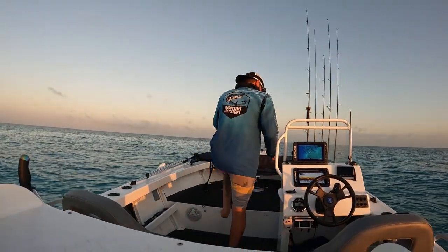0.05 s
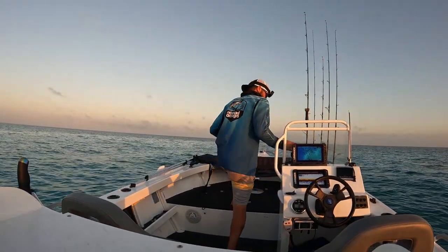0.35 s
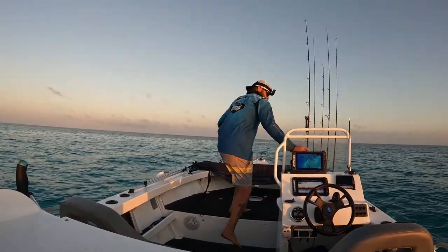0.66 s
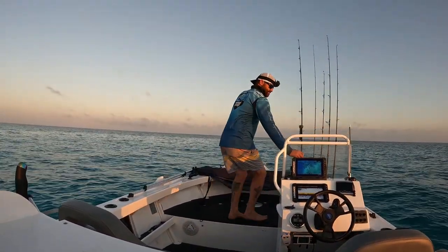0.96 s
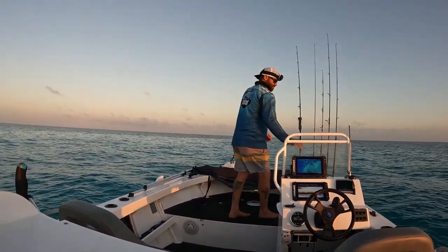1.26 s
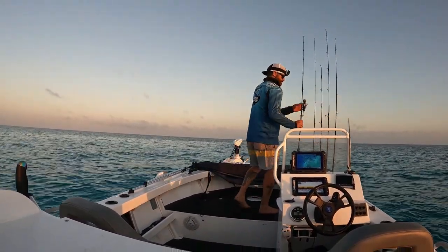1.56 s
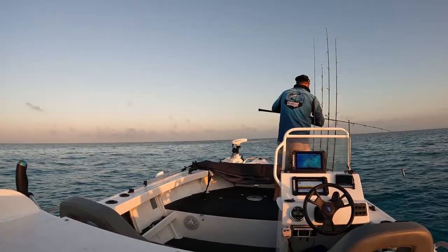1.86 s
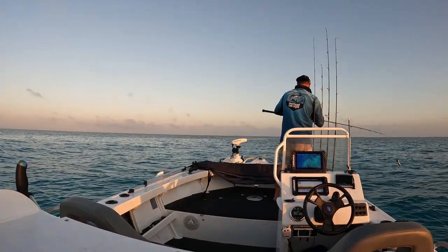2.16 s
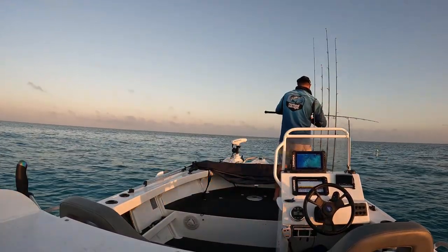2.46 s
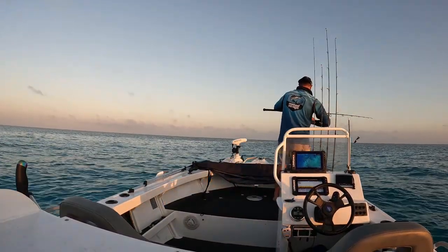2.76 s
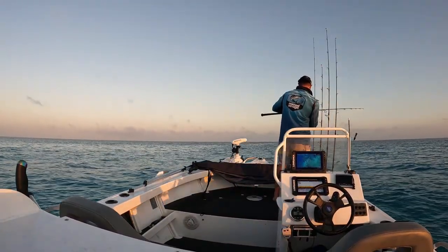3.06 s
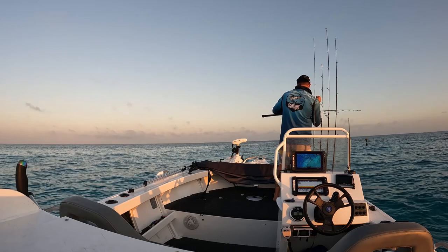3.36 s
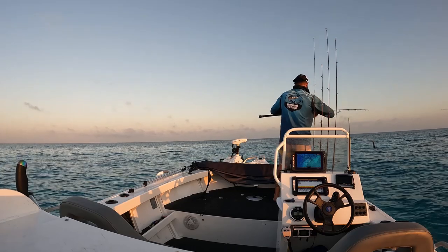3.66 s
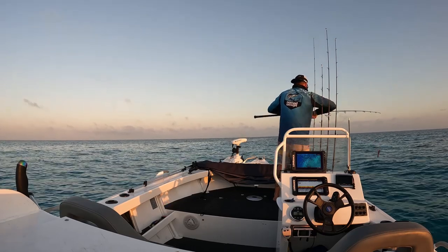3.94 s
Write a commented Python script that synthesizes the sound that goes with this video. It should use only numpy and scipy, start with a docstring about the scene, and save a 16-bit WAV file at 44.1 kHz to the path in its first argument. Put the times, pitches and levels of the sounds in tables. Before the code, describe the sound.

Low thuds of feet cross the deck of a small drifting boat, over wind rumbling on the microphone. Wavelets slap the metal hull, water trickles and gurgles alongside, and faint ticks from a fishing rod follow.

```python
"""A low rumble of wind and swell comes first, with bare feet thumping along a small metal boat's deck.
Water trickles along the side of the drifting boat; air pockets glug under it and bubbles splash, each
ringing at its own resonance. A few dry clicks sound and someone rustles about. Wavelets slap the hull
and excite the modes of its plates, and fishing tackle ticks faintly."""
import sys
import numpy as np
from scipy import signal
from scipy.fft import rfft, irfft, next_fast_len
from scipy.io import wavfile
from scipy.ndimage import uniform_filter1d, map_coordinates

SR = 44100
rng = np.random.default_rng(int(sys.argv[2]) if len(sys.argv) > 2 else 0)


def put_to_file(sound):
    """Save the sound as 16-bit audio at rate SR, in the file named by the first command-line argument."""
    columns = np.atleast_2d(sound).T  # one column per channel
    safe = np.clip(columns, -1, 1)
    whole_steps = np.round(safe * 32767)
    wavfile.write(sys.argv[1], SR, whole_steps.astype(np.int16))


N = 176400


def amp(db):
    """Decibels to amplitude ratio."""
    return 10 ** (np.asarray(db) / 20)


def unit(x):
    """Normalisation to rms 1."""
    return x / np.sqrt(np.mean(x ** 2) + 1e-20)


def since(start_s):
    """Seconds since start_s, for every sample."""
    return np.arange(N) / SR - start_s


def level(rows):
    """Amplitude envelope through (time_s, level_db) points."""
    return amp(np.interp(since(0), *np.transpose(rows)))


def wobble(knots_per_s):
    """Smooth random modulation: a spline through Gaussian values."""
    knots = rng.standard_normal(int(N * knots_per_s / SR) + 4)
    return map_coordinates(knots, [np.arange(N) * knots_per_s / SR])


def filtered(x, response):
    """Linear filtering: the spectrum of x times a frequency response."""
    size = next_fast_len(N + SR // 2)
    return irfft(rfft(x, size) * response(np.fft.rfftfreq(size, 1 / SR)), size)[:N]


def noise(spectrum, grain_db=0):
    """Coloured noise of rms 1; amplitude modulation by grain_db breaks it into millisecond grains."""
    points_hz, gains_db = np.transpose(spectrum)
    white = rng.standard_normal(N) * amp(grain_db * wobble(900))
    return unit(filtered(white, lambda hz: amp(np.interp(np.log(hz + 1), np.log(points_hz), gains_db))))


def patchy(x, depth_db, patch_hz=550, patch_s=0.04):
    """Spectral modulation: x swells and fades in random patches of time and frequency."""
    spectra = signal.stft(x, nperseg=1024)[2]
    field = rng.standard_normal(spectra.shape)
    for axis, width in enumerate([patch_hz * 1024 / SR, patch_s * SR / 512]):
        field = uniform_filter1d(field, max(1, round(width)), axis)
    return unit(signal.istft(spectra * amp(depth_db * unit(field)), nperseg=1024)[1][:N])


def swell(t, rise_s):
    """Transient envelope: a soft rise to 1 at rise_s, then a near-exponential fall."""
    u = np.maximum(t, 0) / rise_s
    return (u * np.exp(1 - u)) ** 2


def burst(t, rise_s, decay_s, tail_db, tail_s):
    """Impact envelope: exponential growth until t = 0, then a main decay plus a weaker one."""
    before, after = np.minimum(t, 0), np.maximum(t, 0)
    return np.exp(before / rise_s) * (np.exp(-after / decay_s) + amp(tail_db) * np.exp(-after / tail_s))


def deck_echo(x, decay_s=0.008):
    """Early reflections from the deck and sides, equal in energy to the direct sound."""
    t = np.arange(SR // 10) / SR
    echo = rng.standard_normal(len(t)) * np.exp(-t / decay_s)
    return (x + signal.fftconvolve(x, echo / np.linalg.norm(echo))[:N]) / np.sqrt(2)


# Envelopes of the wind and of the water churning under the hull: time_s, level_db
WIND_LEVELS = [(0, -31), (.3, -30.5), (.38, -34.5), (.48, -28.5), (.72, -34), (.9, -29), (1.35, -37),
               (1.52, -29.5), (1.74, -36), (2.17, -37), (2.6, -42.5), (2.82, -21.5), (3.03, -41.5),
               (3.17, -51.5), (3.26, -32.5), (3.43, -40), (3.8, -32), (4, -31.5)]
CHURN_LEVELS = [(0, -49), (.22, -39.5), (.38, -38.5), (.72, -45.5), (.82, -35), (1.08, -30.5), (1.33, -43),
                (2.02, -44), (2.09, -60), (2.17, -43.5), (2.38, -42.5), (2.55, -39), (2.9, -39.5),
                (3.11, -53), (3.31, -35.5), (3.42, -50), (3.8, -39.5), (4, -39.5)]
# Their spectra: frequency_hz, gain_db
WIND_BANDS = [(28, -1), (50, -4.5), (90, -8.5), (150, -17), (400, -52), (1000, -103)]
CHURN_BANDS = [(60, -17.5), (120, 1), (160, 5.5), (270, -6), (360, -13), (550, -20), (800, -31),
               (2000, -95)]


def wind_and_sea():
    """Turbulence: wind and churning water make low-frequency noise, over a faint far hiss."""
    wind = amp(-2) * level(WIND_LEVELS) * noise(WIND_BANDS)
    churn = amp(-4) * level(CHURN_LEVELS) * noise(CHURN_BANDS) * amp(4.15 * wobble(14))
    hiss = amp(-85) * noise([(500, 13), (3500, -15.5), (5000, -5), (12500, -21.5), (15000, -29)])
    return wind + churn + hiss


# Envelope of the water running along the side: time_s, level_db
TRICKLE_LEVELS = [(0, -69), (.28, -68.5), (.36, -79.5), (.46, -62), (.57, -72.5), (.74, -66), (.9, -60),
                  (1.22, -53.5), (1.39, -62), (1.62, -53.5), (1.78, -68.5), (1.92, -73.5), (2.09, -72.5),
                  (2.15, -57), (2.27, -58), (2.56, -75.5), (2.62, -63.5), (2.75, -76.5), (3.14, -73),
                  (3.45, -69), (3.67, -66), (3.74, -63), (4, -64.5)]
# Spectrum of its fizz: frequency_hz, gain_db
FIZZ_BANDS = [(300, -9), (550, 4), (1100, 7), (1650, 3.5), (2300, -4), (4100, -9.5), (4700, -29),
              (8500, -26.5), (15000, -41.5)]


def trickle(bubbles_per_s=95, centre_hz=1372, spread_oct=1.1, decay_cycles=9.9, chirp=0.031):
    """Bubble resonance: each rising bubble is a damped oscillator gliding upward, on a bed of fizz."""
    onset, pitch_a, pitch_b, size = rng.random((int(bubbles_per_s * N / SR), 4)).T[:, :, None]
    pitch_hz = centre_hz * 2 ** (spread_oct * (pitch_a + pitch_b - 1))
    samples = np.arange(SR // 20)
    cycles = pitch_hz * samples / SR
    age = cycles / decay_cycles
    envelopes = amp(-4 * np.log(size + 0.036)) * (1 - np.exp(-cycles)) * np.exp(-age)
    rings = envelopes * np.sin(2 * np.pi * cycles * (1 + chirp * age / 2))
    positions = (onset * N).astype(int) + samples
    bubbles = np.bincount(positions.ravel(), rings.ravel(), N)[:N]
    fizz = patchy(noise(FIZZ_BANDS, grain_db=2), depth_db=5.5)
    return amp(-0.5) * level(TRICKLE_LEVELS) * (fizz + amp(-5.5) * unit(bubbles))


# Blows of feet and gear on the deck: start_s, boom_db, pitch_hz, rise_s, knock_db
DECK_THUMPS = [(0.087, -23, 55.5, 0.018, -24), (0.159, -26, 39.6, 0.032, -30), (0.217, -27, 50, 0.017, -32),
               (0.248, -23.5, 34.6, 0.043, -28), (0.421, -27.5, 31.5, 0.032, -32),
               (0.561, -32.5, 65.4, 0.028, -25.5), (0.593, -17.5, 46.3, 0.022, -27),
               (0.798, -28, 46.2, 0.043, -29.5), (0.844, -24, 54, 0.052, -22.5),
               (0.983, -23.5, 49.3, 0.012, -36.5), (1.417, -22, 40.7, 0.0044, -33),
               (1.571, -32, 54.5, 0.018, -34), (1.87, -34, 76.6, 0.049, -33),
               (1.98, -24.5, 51.9, 0.022, -36), (2.429, -30.5, 63.4, 0.019, -32),
               (2.712, -27.5, 72.3, 0.03, -31.5), (2.785, -24.5, 53.4, 0.008, -27.5),
               (2.826, -27, 80, 0.024, -35.5), (3.326, -28, 56.8, 0.011, -49.5),
               (3.727, -33, 54.6, 0.051, -37)]
# Spectrum of the knocking panels: frequency_hz, gain_db
KNOCK_BANDS = [(50, -10.5), (100, 7.5), (170, 0), (270, -6.5), (380, -20.5), (600, -37), (1500, -60),
               (4000, -62), (8000, -99)]


def footsteps():
    """Impact excitation: each thump flexes the deck in a heavily damped boom and knocks its panels."""
    boom, knock = np.zeros((2, N))
    for start_s, boom_db, pitch_hz, rise_s, knock_db in DECK_THUMPS:
        t = since(start_s)
        boom += amp(boom_db) * swell(t, rise_s) * np.sin(2 * np.pi * pitch_hz * t)
        knock += amp(knock_db) * swell(t, rise_s=0.016)
    return boom + knock * noise(KNOCK_BANDS)


# Air trapped under the hull: start_s, level_db, pitch_hz, glide_oct_per_s, rise_s
AIR_POCKETS = [(.162, -25, 168.4, 3, 0.023), (1.168, -27, 105.4, -0.5, 0.029), (1.272, -39.5, 556, 0, 0.02),
               (1.611, -31.5, 181.3, 6.5, 0.027), (1.662, -35, 249.4, 1.5, 0.03),
               (1.874, -31, 226.5, -8, 0.02), (2.122, -24.5, 210, 7, 0.004),
               (2.300, -35.5, 670, -2, 0.0064), (2.316, -40, 588, 7, 0.011), (2.425, -40, 490, -2.5, 0.012),
               (2.456, -31, 197, 0, 0.014), (2.457, -31.5, 246.6, -0.3, .026), (2.602, -48, 668, -1, .007),
               (2.795, -23, 181.5, -10.5, 0.011), (2.834, -51.5, 774, 4, 0.015),
               (2.866, -57.5, 1513, 0, 0.017), (2.966, -47, 404, -0.5, 0.011), (3.028, -60, 1036, 1, 0.016),
               (3.009, -39, 145.2, 2, 0.054), (3.164, -32, 142.3, 2.3, 0.044), (3.243, -50, 548, 2.5, 0.01),
               (3.504, -20, 84.4, 2.15, 0.033), (3.53, -27.5, 139.6, -6, 0.014),
               (3.719, -36, 305, 1.4, 0.018), (3.958, -34, 222.8, 6, 0.015)]


def glugs():
    """Air-pocket resonance: trapped air rings at a pitch that glides as the pocket changes size."""
    out = np.zeros(N)
    flutter = 1 + 0.18 * wobble(90)
    for start_s, level_db, pitch_hz, glide_oct_per_s, rise_s in AIR_POCKETS:
        t = np.clip(since(start_s), 0, 0.5)
        phase = 2 * np.pi * np.cumsum(pitch_hz * 2 ** (glide_oct_per_s * t) * (t > 0)) / SR
        jitter = pitch_hz / 750 * wobble(170)  # small pockets break up and ring less cleanly
        out += amp(level_db) * swell(t, rise_s) * np.sin(phase + jitter) * flutter
    return out


# Small splashes along the side: start_s, level_db, centre_hz, rise_s
BUBBLE_CLOUDS = [(0.163, -62.5, 1510, 0.01), (0.404, -53, 1126, .016), (0.473, -56.5, 1770, 0.0079),
                 (0.871, -38, 412, 0.011), (0.897, -38.5, 590, 0.014), (1.024, -51, 4050, 0.015),
                 (1.278, -47, 960, 0.011), (1.617, -47.5, 1610, 0.0072), (2.126, -42, 1590, 0.01),
                 (2.296, -51.5, 740, 0.021), (2.453, -56, 1460, 0.012), (3.17, -61.5, 800, 0.0088),
                 (3.324, -56.5, 778, 0.017), (3.6, -53, 1910, .012), (3.93, -58.5, 1120, 0.011)]


def splashes(half_width_oct=0.18):
    """Bubble-cloud resonance: bubbles of about one size give a narrow noise band over broad fizz."""
    out = np.zeros(N)
    fizz = noise(FIZZ_BANDS, grain_db=6)
    pops = noise([(4100, -1), (4900, -17), (15000, -20.5)], grain_db=-1.5)
    for start_s, level_db, centre_hz, rise_s in BUBBLE_CLOUDS:
        cloud = filtered(pops, lambda hz: 1 / (1 + (np.log2((hz + 1) / centre_hz) / half_width_oct) ** 2))
        envelope = swell(since(start_s), rise_s)
        splash = envelope * (unit(cloud) + amp(-30) * fizz)
        out += amp(level_db) * splash * np.linalg.norm(envelope) / np.linalg.norm(splash)
    return out


# Short, dry clicks, mostly faint; the loudest is the hard edge of a wave slap: time_s, level_db
CRISP_CLICKS = [(.268, -76.5), (.478, -77), (1.098, -61), (1.158, -43), (2.791, -71.5), (3.717, -66)]
# Spectrum of a click: frequency_hz, gain_db
CLICK_BANDS = [(4000, 1), (8800, -1), (15000, -16)]


def crisp_clicks(rise_s=0.002):
    """Broadband transients: a few milliseconds of grainy noise are heard as a click with no ring."""
    pulses = sum(amp(db) * swell(since(time_s - rise_s), rise_s) for time_s, db in CRISP_CLICKS)
    return pulses * noise(CLICK_BANDS, grain_db=4.5)


# Soft scuffs: start_s, level_db, rise_s
SCUFFS = [(0.639, -66.5, 0.038), (0.863, -72, 0.014), (1.512, -64.5, 0.02), (1.649, -58.5, 0.012),
          (3.69, -65, 0.032), (3.779, -66, 0.035), (3.971, -58.5, 0.045)]
# Spectrum of the rubbing: frequency_hz, gain_db
SCUFF_BANDS = [(1000, -2.5), (3700, 1.5), (4800, -13.5), (8500, -17.5), (14000, -37)]


def rustles():
    """Friction noise: brief grainy scuffs as someone moves about."""
    strokes = sum(amp(db) * swell(since(start_s), rise_s) for start_s, db, rise_s in SCUFFS)
    return strokes * noise(SCUFF_BANDS, grain_db=4.5)


# Wavelets striking the hull:
# peak_s, body_db, spray_db, spray_lead_s, rise_s, body_decay_s, spray_decay_s, ring_db
WAVELETS = [(0.998, -22.5, -34.5, 0.0041, .012, 0.027, 0.0079, -30),
            (1.162, -30, -33, 0.0042, 0.0055, 0.037, 0.0087, -34),
            (1.224, -46.5, -51.5, 0.0027, 0.0032, 0.038, 0.0039, -45),
            (3.506, -34.5, -48, 0.022, 0.017, 0.03, 0.02, -54)]
# Spectra of the water's mass and of its spray: frequency_hz, gain_db
BODY_BANDS = [(80, -12.5), (170, 0.5), (260, 1.5), (330, -1.5), (470, 0), (650, -7.5), (1000, -13.5),
              (1600, -18), (3000, -31.5), (6000, -77)]
SPRAY_BANDS = [(400, -41), (1000, -24), (1600, 4.5), (2600, 1.5), (4000, 5.5), (4800, -10), (8500, -16.5),
               (11000, -28.5), (15000, -30)]
# Modes of the hull plates: pitch_hz, level_db, t60_s
HULL_MODES = [(188.8, 1, 0.61), (267.5, 0, 0.49), (382, 2, 0.23), (424, 1.5, .25), (480, 0.5, 0.36),
              (625, -14, 0.67), (808, -0.5, 0.099), (847, -11.5, 0.13), (1317, -16, 0.13),
              (2207, -11, 0.053), (2390, -18, 0.072), (4030, -6, 0.032)]


def hull_slaps(ring_lead_s=0.01202, ring_attack_s=0.0069, waver_rad=0.32):
    """Modal vibration: spray lands first, then the mass of the wavelet, which rings the hull plates."""
    body, spray, ring = np.zeros((3, N))
    for peak_s, body_db, spray_db, spray_lead_s, rise_s, body_decay_s, spray_decay_s, ring_db in WAVELETS:
        body += amp(body_db) * burst(since(peak_s), rise_s, body_decay_s, tail_db=-25, tail_s=0.021)
        spray_t = since(peak_s - spray_lead_s)
        spray += amp(spray_db) * burst(spray_t, rise_s, spray_decay_s, tail_db=-18.5, tail_s=0.051)
        start = round((peak_s - ring_lead_s) * SR)
        t = np.arange(min(SR // 2, N - start)) / SR
        attack = 1 - np.exp(-t / ring_attack_s)
        for (pitch_hz, level_db, t60_s), turn in zip(HULL_MODES, rng.random(len(HULL_MODES))):
            waver = waver_rad * wobble(35)[:len(t)]  # moving water detunes the plates
            envelope = attack * amp(ring_db + level_db - 60 * t / t60_s)
            ring[start:start + len(t)] += envelope * np.sin(2 * np.pi * (pitch_hz * t + turn) + waver)
    body *= noise(BODY_BANDS, grain_db=1.5)
    spray *= noise(SPRAY_BANDS, grain_db=4.5)
    return body + ring + deck_echo(spray)


# Ticks of the fishing tackle: peak_s, level_db
TACKLE_TICKS = [(1.054, -66), (1.187, -55), (1.883, -62), (1.927, -65.5), (1.958, -72), (1.98, -91),
                (2.053, -66.5), (2.127, -64), (2.156, -70), (2.224, -56), (2.262, -63.5), (2.298, -75),
                (2.405, -69.5), (2.457, -73.5), (2.55, -78), (2.63, -76.5)]
# Spectrum of the tackle: frequency_hz, gain_db
TACKLE_BANDS = [(1500, -17), (3300, 2.5), (5000, -12), (6800, 0), (9000, 3), (11200, -8.5), (12800, -3),
                (15500, -21.5)]


def tackle(rise_s=0.004, rattle_db=-11.5, rattle_lag_s=0.025, rattle_spread_s=0.024):
    """Contact noise: light ticks, each of its own colour, inside a soft rattle of the rod and reel."""
    blows = np.zeros(N)
    for peak_s, level_db in TACKLE_TICKS:
        t = since(peak_s)
        rattle = amp(rattle_db) * np.exp(-abs(t - rattle_lag_s) / rattle_spread_s)
        blows += amp(level_db) * (swell(t + rise_s, rise_s) + rattle)
    return deck_echo(blows * patchy(noise(TACKLE_BANDS, grain_db=4.5), depth_db=3))


def scene():
    """Superposition: deck, hull and sea add at one listening point near the stern."""
    events = footsteps() + hull_slaps() + glugs() + splashes() + tackle() + crisp_clicks() + rustles()
    return (events + trickle() + wind_and_sea())[None]


def record(dry):
    """Band limiting: an ideal low-pass filter keeps only what lies below 15.5 kHz."""
    return filtered(dry[0], lambda hz: hz < 15500)[None]


dry = scene()
out = record(dry)
put_to_file(out)
```